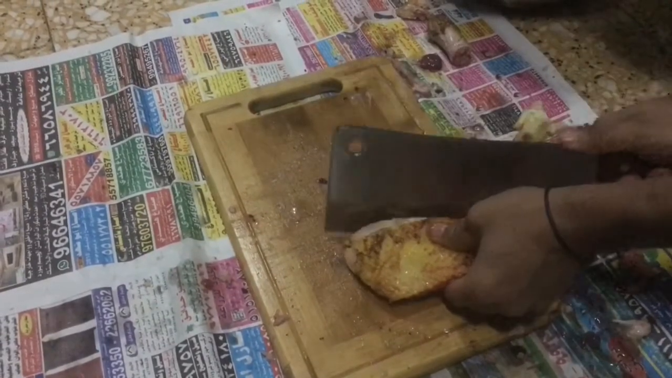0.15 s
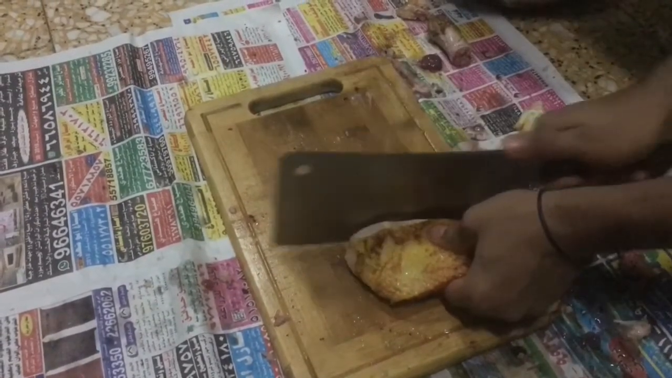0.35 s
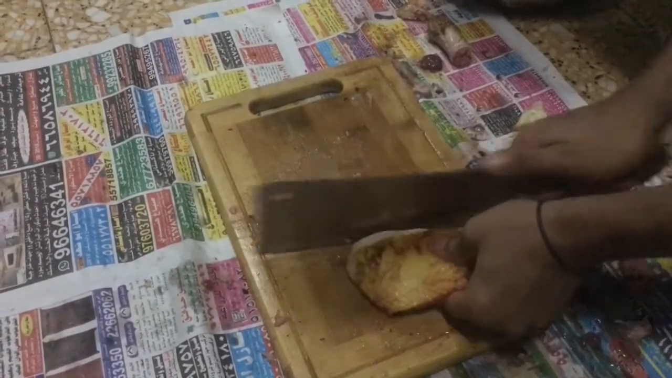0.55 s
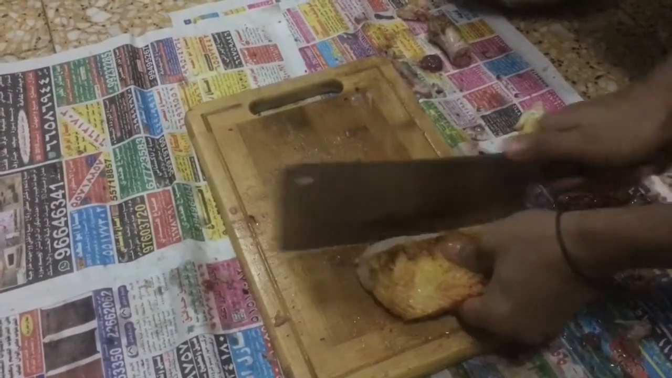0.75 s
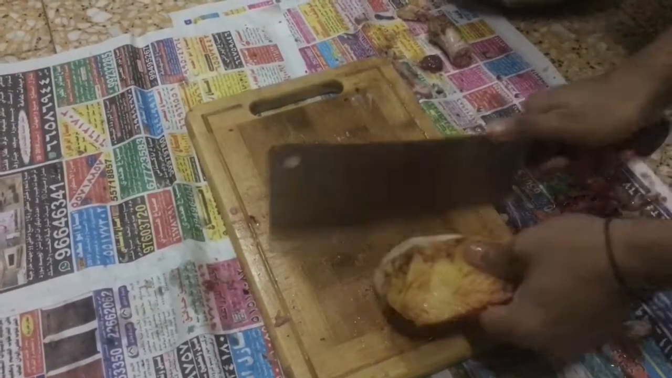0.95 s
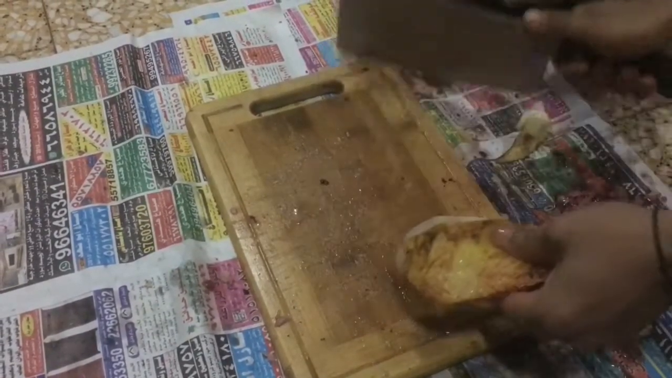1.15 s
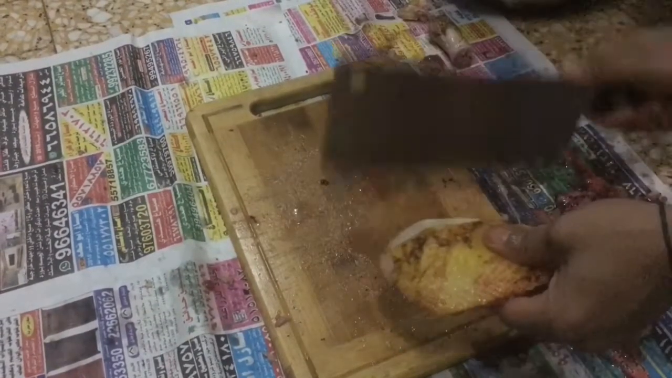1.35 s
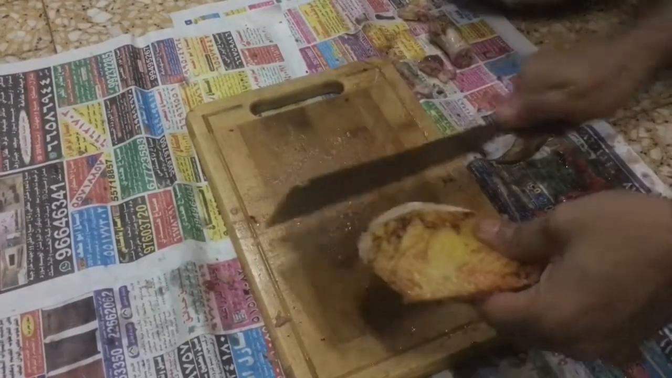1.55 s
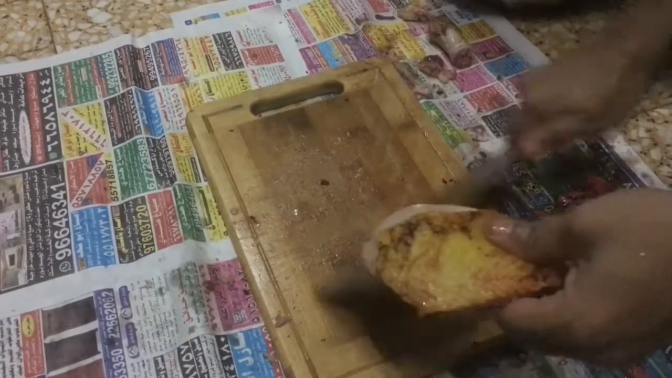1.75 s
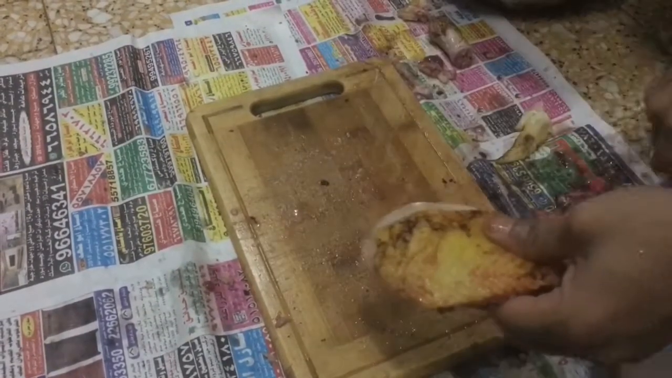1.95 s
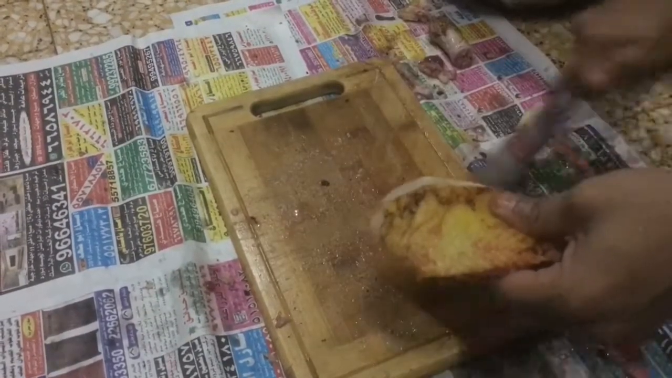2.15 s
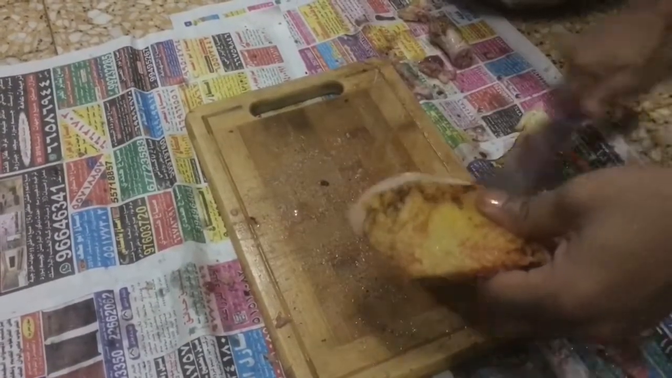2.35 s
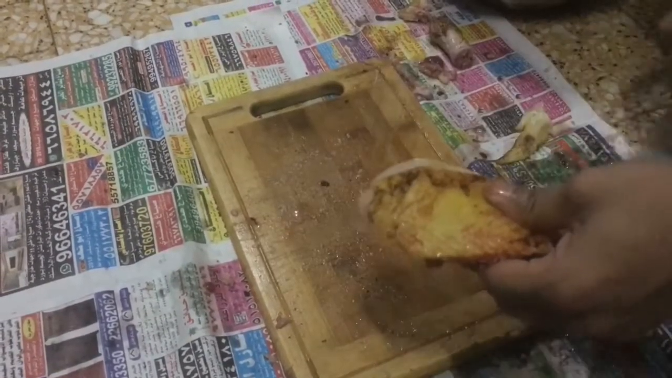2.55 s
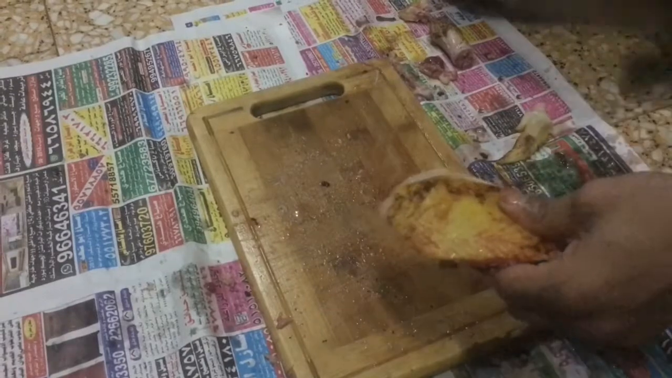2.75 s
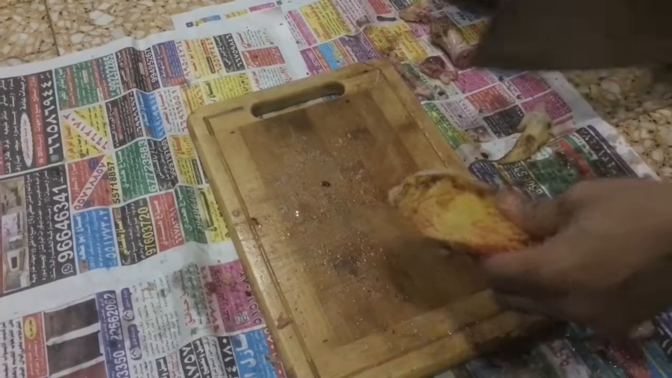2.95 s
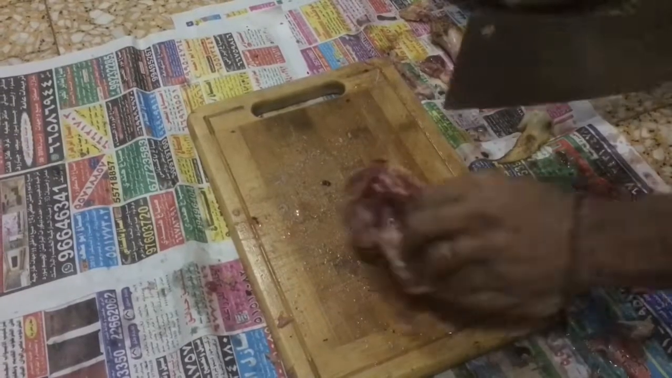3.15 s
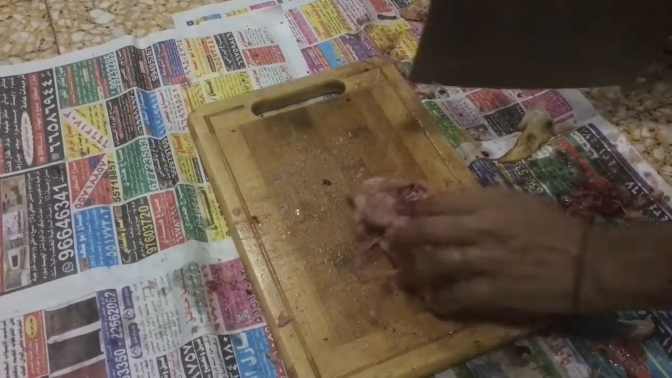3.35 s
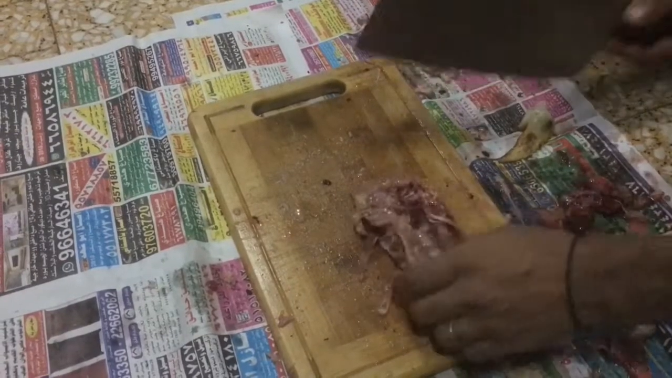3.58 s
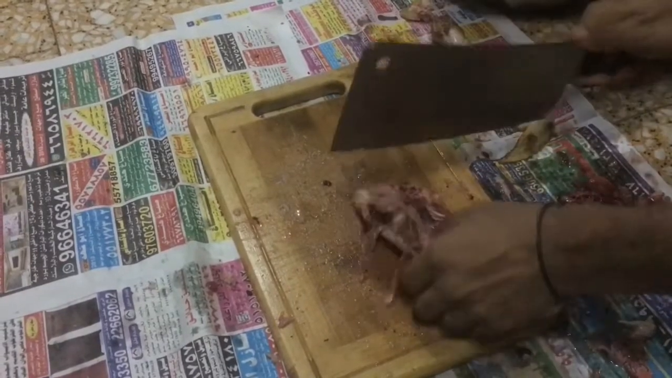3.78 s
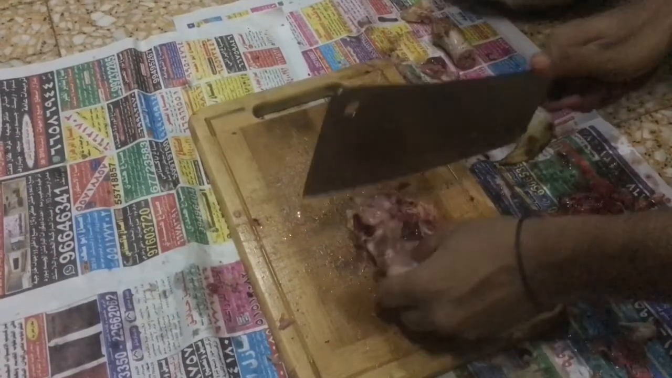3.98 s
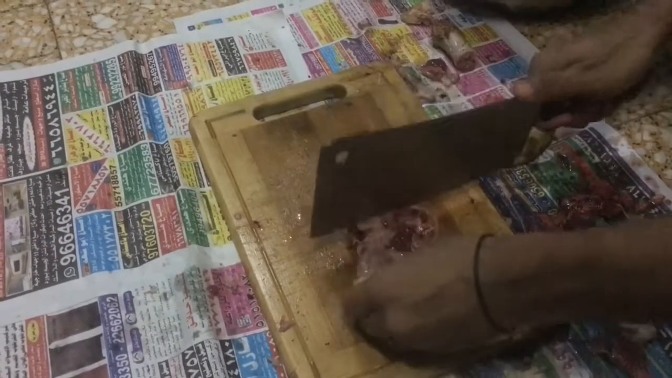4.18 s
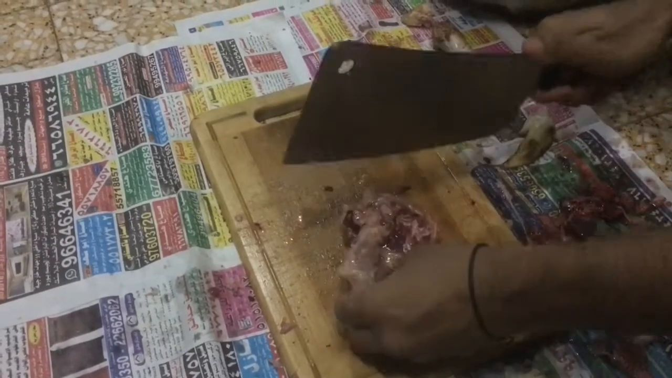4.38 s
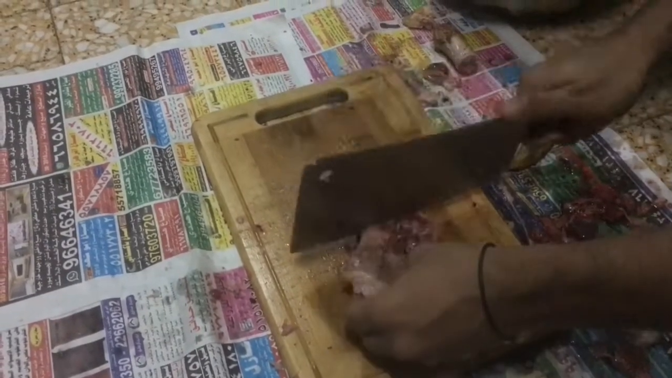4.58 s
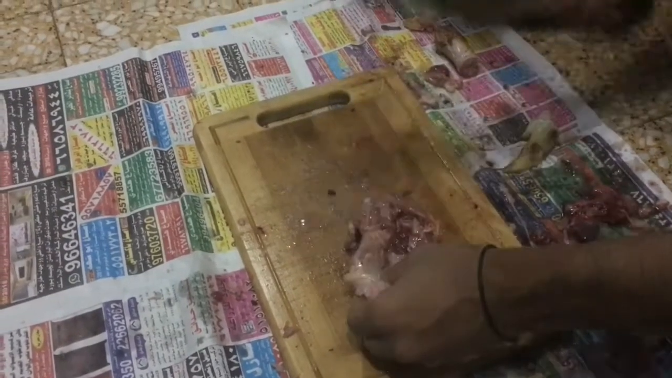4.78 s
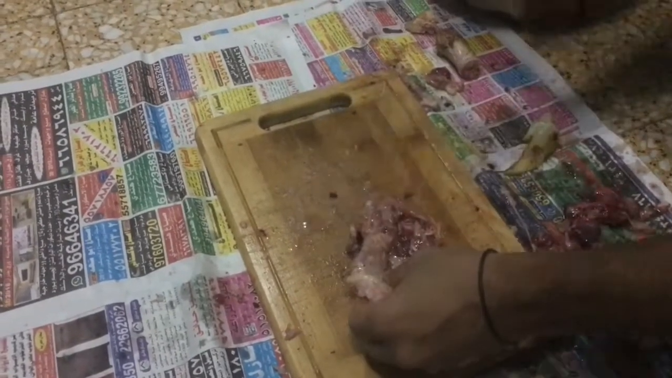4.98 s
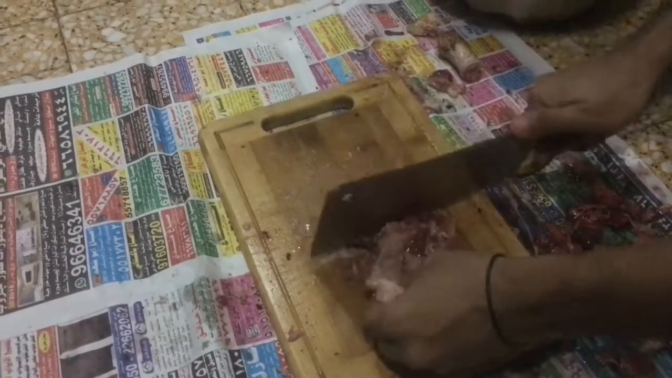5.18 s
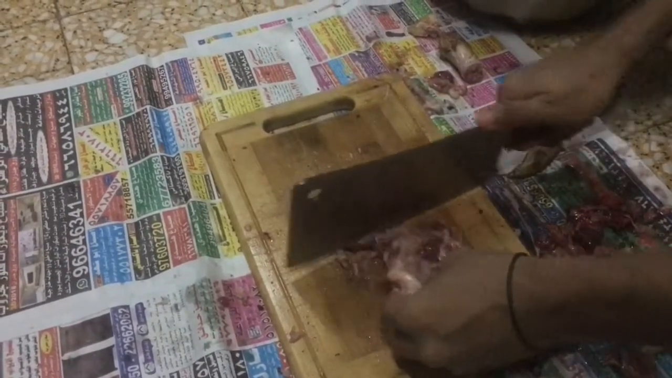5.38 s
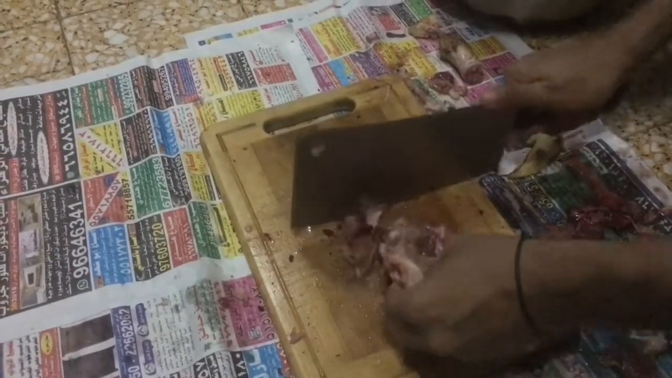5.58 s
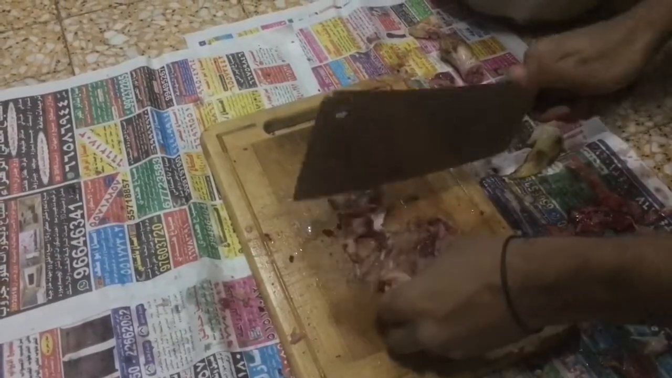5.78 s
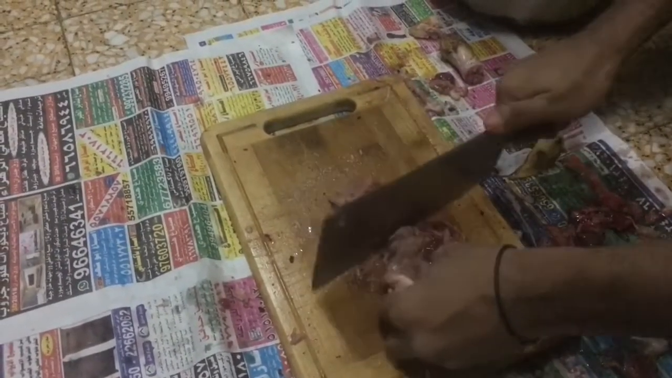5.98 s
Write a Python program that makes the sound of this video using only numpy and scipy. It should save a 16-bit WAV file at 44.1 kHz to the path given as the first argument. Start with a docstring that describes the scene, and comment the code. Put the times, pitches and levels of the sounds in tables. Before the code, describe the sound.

A low, slightly wavering fan hum with rushing air fills a small hard-floored room throughout, heard by a phone close to the work. From about 0.35 to 1.2 s a cleaver's edge scrapes over a wooden board in short strokes, rasping and hissing with a thin metallic ring; the stroke near 1.0 s is stronger and juddering. At 1.7 s a dull knock leads into the loudest, woodiest scrape, followed by a sharp knock with a bright blade ring at 2.0 s and, at 2.3 s, a duller knock with a short scrape. Then mostly hum: faint wet smacks at 3.3 s as meat is laid down, tiny sticky crackles from 4 s, a clearer wet smack at 4.6 s. At 5.13 s one very loud chop thumps the board and crunches through bone in splinters. The hum ducks, then creeps back; a light, damp knock lands at 6.0 s.

```python
"""A cleaver at work on a wooden board over newspaper on a stone floor, heard by a phone close by.
A fan hums throughout: rushing air as coloured noise, boom as resonances, motor tones as wavering sines.
First the edge scrapes scraps aside (slips shake board and blade) and knocks on the wood (ringing modes).
Then meat is laid down and handled in wet crackles, and one hard chop splits a chicken bone in a splinter shower.
The phone's gain control ducks after the chop and creeps back; a light knock comes at the very end."""
import sys
import numpy as np
from scipy import signal
from scipy.fft import rfft, irfft
from scipy.io import wavfile
from scipy.ndimage import uniform_filter1d, minimum_filter1d, map_coordinates

SR = 44100
rng = np.random.default_rng(int(sys.argv[2]) if len(sys.argv) > 2 else 0)


def wav_out(sig):
    """Save sig, one row per channel (or a flat mono array), as 16-bit PCM at SR to the path in sys.argv[1]."""
    wavfile.write(sys.argv[1], SR, np.round(np.clip(np.atleast_2d(sig).T, -1, 1) * 32767).astype(np.int16))


N = 265482  # length in samples
TOP_HZ = 16000  # the microphone hears nothing above this


def amp(db):
    """Decibels to gain."""
    return 10 ** (np.asarray(db) / 20)


def unit(x):
    """Scale to rms 1."""
    return x / np.sqrt(np.mean(x ** 2) + 1e-18)


def burst(x, db):
    """Scale a short sound so that its energy, spread over 10 ms, has this level."""
    energy = np.sum(x ** 2)
    return x * amp(db) / np.sqrt(energy / (SR / 100) + 1e-18)


def add(out, s, x):
    """Mix x into out from s seconds on, cutting what runs past the end."""
    i = max(int(s * SR), 0)
    out[i:i + len(x)] += x[:max(len(out) - i, 0)]


def fade(t60, size=16384):
    """Exponential decay that falls 60 dB in t60 seconds."""
    return np.exp(-np.log(1000) * np.arange(size) / SR / max(t60, 1 / SR))


def through(x, response):
    """Play x through an impulse response, keeping its length."""
    return signal.oaconvolve(x, response)[:len(x)]


def colour(points, size=4096):
    """Minimum-phase impulse response whose spectrum passes through (Hz, dB) points."""
    hz, db = np.transpose(points)
    bins_hz = np.arange(size // 2 + 1) * SR / size
    log_gain = np.log(amp(np.interp(np.log(bins_hz + 1), np.log(hz), db)))
    # folding the cepstrum forward in time makes the response causal
    cepstrum = irfft(log_gain)
    cepstrum[1:size // 2] *= 2
    cepstrum[size // 2 + 1:] = 0
    return irfft(np.exp(rfft(cepstrum)))


def ring(modes, wave, size=8192):
    """Sum of decaying (Hz, dB, t60) modes; a cosine start keeps the bass clean, a sine start the treble."""
    t = np.arange(size) / SR
    return sum(amp(db) * fade(t60, size) * wave(2 * np.pi * hz * t) for hz, db, t60 in modes)


def band(x, hz, width):
    """One resonance, width in Hz."""
    b, a = signal.iirpeak(min(hz, TOP_HZ), hz / min(width, TOP_HZ), fs=SR)
    return signal.lfilter(b, a, x)


def walk(rate, size):
    """Random wandering of rms 1 that takes a new direction rate times a second."""
    steps = np.arange(size) * rate / SR
    return unit(np.interp(steps, np.arange(1024), rng.standard_normal(1024)))


def grains(spread_db, size):
    """Dense tiny slips of very unequal strength, redrawn every 8 samples."""
    strengths = np.repeat(rng.standard_normal(size // 8 + 1), 8)[:size]
    return unit(rng.standard_normal(size) * amp(spread_db * strengths))


def fan(air_db=-39.5, flutter_db=1.35, waver_db=1.5, drift_hz=0.67):
    """Rushing air, the boom it raises in the room, and slightly wavering motor tones."""
    # Spectrum of the rushing air. Each row: frequency in Hz, relative level in dB.
    air_points = [(22, -37), (60, -10), (100, -0.5), (160, -1), (250, -12), (330, -11.5), (420, -21),
                  (560, -16), (780, -22), (1200, -18.5), (1800, -23), (3200, -32), (6500, -41.5),
                  (16000, -55.5)]
    # Boom of the room. Each row: frequency in Hz, filter width per pass in Hz, level in dB.
    boom_modes = [(39.4, 9.4, -45.5), (66.9, 7.2, -50.5), (106.8, 11.8, -49.5), (155.8, 23, -47.5),
                  (1650, 100, -57.5)]
    # Tones of the motor. Each row: mean frequency in Hz, mean level in dB.
    hum_tones = [(107.7, -51), (193.8, -51), (290.7, -47), (430.7, -61.5), (969, -58.5), (1938, -71),
                 (2369, -68), (2837, -78.5)]
    air = unit(through(rng.standard_normal(N), colour(air_points)))
    air = air * amp(air_db + flutter_db * walk(12, size=N))
    rush = rng.standard_normal(N)
    boom = np.zeros(N)
    for hz, width, db in boom_modes:
        boom += amp(db) * unit(band(band(rush, hz, width), hz, width))
    hum = np.zeros(N)
    for hz, db in hum_tones:
        phase = 2 * np.pi * np.cumsum(hz + drift_hz * walk(6, size=N)) / SR
        hum += np.sqrt(2) * np.sin(phase) * amp(db + waver_db * walk(4.96, size=N))
    return air + boom + hum


def sweep(share, fastest):
    """Speed of a hand stroke, 0-1: it gathers from rest, peaks, and comes to rest again."""
    rise_and_fall = np.interp(share, [0, np.clip(fastest, .05, .95), 1], [0, 1, 0])
    return np.sin(np.pi / 2 * rise_and_fall)


def scrapes(flex, wood, steel, pressed, rumble_db=-2, chatter_db=2.5, chatter_rate=260, judder_hz=78,
            bend_share=0.0138, grip_share=.015, bite_s=0.033, rasp_law=0.75, hiss_law=1.05, size=16384):
    """The edge sticks and slips over the grain, shaking board and blade; speed sets the loudness."""
    # Strokes of the edge over the board. Each row: start in seconds, length in seconds, fastest at share 0-1,
    # bites at share 0-1, drop of the wood away from the bite in dB, then levels in dB ahead of speed and bite:
    # rasp of the wood, shaking board, hiss of the steel, free blade ring, pressed blade ring;
    # last the swing of the judder in dB.
    strokes = [(0.074, 0.066, .55, .5, 2, -54, -70, -63, -49.5, -52.5, 3),
               (0.353, 0.19, 0.57, 0.61, 3, -35.5, -43, -44, -45, -45.5, 0),
               (0.569, 0.16, 0.48, 0.58, 4, -32.5, -43.5, -40, -43.5, -40, -1),
               (0.751, .14, 0.33, 0.4, 5, -35.5, -45.5, -43, -42.5, -46.5, -1),
               (0.921, 0.13, 0.9, .5, 0, -56, -58, -60, -52, -56, 1),
               (1.007, 0.081, 0.39, 0.93, 5.5, -27, -30.5, -40.5, -29.5, -49, 7),
               (1.077, 0.11, 0.28, 0.28, 5.5, -33.5, -31.5, -34.5, -31.5, -41, 2.5),
               (1.728, .13, 0.7, 0.69, 6, -39, -28.5, -56.5, -59, -54, 2),
               (1.783, 0.2, .72, 0.31, 19, -17.5, -28.5, -33, -37, -33.5, -0.5),
               (2.345, 0.22, .48, 0.26, 4.5, -40, -42, -35, -60, -35, 1.5)]
    # Spectrum of the wood's rasp. Each row: frequency in Hz, relative level in dB.
    rasp_points = [(300, -27.5), (700, -10), (1000, -12.5), (1300, -2), (1530, 5.5), (1800, -11.5),
                   (2300, -10.5), (3200, -13.5), (5000, -34)]
    # Spectrum of the steel's hiss. Each row: frequency in Hz, relative level in dB.
    hiss_points = [(1000, -14), (2000, 1.5), (3500, 4.5), (5300, -6), (7000, -3.5), (9500, -3.5),
                   (12500, -13), (16000, -19.5)]
    out, rasp, hiss = np.zeros(N), colour(rasp_points), colour(hiss_points)
    i = np.arange(size)
    t = i / SR
    for s, length, fastest, bites, bite_db, rasp_db, board_db, hiss_db, free_db, pressed_db, judder_db in strokes:
        speed = sweep(t / length, fastest)
        # the edge digs into the wood for about bite_s either side of its bite
        bite = np.exp(-((t - bites * length) / bite_s) ** 2)
        chatter = chatter_db * np.clip(walk(chatter_rate, size=size), -1.5, 1.5)
        # a steeply held edge hops along almost regularly
        hop_hz = judder_hz * (1 + 0.15 * walk(58, size=size))
        judder = judder_db * np.cos(2 * np.pi * np.cumsum(hop_hz) / SR)
        slips = unit(grains(spread_db=2.5, size=size) * amp(chatter + judder))
        # loudness of wood and steel goes with the speed of the edge to these powers
        on_wood = slips * speed ** rasp_law * amp(bite_db * (bite - 1))
        on_steel = slips * speed ** hiss_law
        paths = [(on_wood, rasp, rasp_db), (on_wood, wood, board_db), (on_wood, flex, board_db + rumble_db),
                 (on_steel, hiss, hiss_db), (on_steel, steel, free_db), (on_steel, pressed, pressed_db)]
        *steady, edge = [through(x, h / np.linalg.norm(h)) * amp(db) for x, h, db in paths]
        # grip and point of contact wander and pull the pitch of the pressed blade along
        detune = grip_share * walk(8, size=size) + bend_share * walk(50.24, size=size)
        bent_edge = map_coordinates(edge, [i + np.cumsum(detune)], order=3)
        add(out, s, sum(steady) + bent_edge)
    return out


def smacks(size=8192):
    """Wet flesh sticks and parts in small bright crackles: fading grains through one wide resonance."""
    # Wet smacks of meat and skin. Each row: start in seconds, level in dB, centre in Hz, t60 in seconds.
    wet_smacks = [(0.111, -51, 8000, .05), (1.723, -44.5, 8000, 0.011), (3.303, -47, 4270, 0.034),
                  (3.337, -51.5, 9000, 0.011), (3.4194, -49.5, 9000, 0.022), (4.587, -37.5, 5000, 0.05),
                  (4.5926, -31.5, 3950, 0.037), (4.61, -50, 6000, 0.2), (4.6838, -57, 10000, .012),
                  (4.716, -53.5, 7000, 0.06), (5.191, -29, 9000, .03), (5.254, -49, 10000, .012),
                  (5.4765, -50.5, 7900, 0.017), (5.998, -36.5, 6940, 0.087), (6.0058, -32.5, 9900, 0.016)]
    out = np.zeros(N)
    for s, db, hz, t60 in wet_smacks:
        crackles = grains(spread_db=2.0, size=size) * fade(t60, size)
        add(out, s, burst(band(crackles, hz, 1.5 * hz), db))
    return out


def knocks(flex, wood, steel, crack_t60=0.012, crack_width=0.65, thud_t60=0.045, thud_db=-3, size=8192):
    """Each blow bends the board, rings wood and blade, and cracks; a longer contact is duller."""
    # Blows of the cleaver. Each row: start in seconds, thump in dB, thump centre in Hz, wood in dB,
    # contact in ms, blade ring in dB, crack in dB, crack centre in Hz.
    blows = [(1.709, -21, 189, -17.5, 0.24, -62, -27, 2970),
             (1.9952, -34, 199, -13.5, 0.07, -15.5, -14, 2470),
             (2.196, -62, 200, -54, 0.025, -45.5, -48, 5040),
             (2.3048, -15.5, 165, -14, 0.16, -42, -14.5, 1450),
             (4.177, -59.5, 200, -56.5, .03, -46.5, -44.5, 5600),
             (5.111, -48, 199, -35, 0.024, -48, -34, 2003), (5.1215, -53, 201, -45, 0.039, -49, -41, 1710),
             (5.1297, -11, 201, -1.5, 0.039, -11, -9, 5500),
             (5.1325, -7.5, 252, 4.5, 0.064, -25.5, -15, 7450), (5.139, -4.5, 90, 0, 0.14, -35, 1.5, 1520),
             (5.147, 1, 102, -2.5, 0.048, -28.5, -5, 1600), (5.1905, -4.5, 294, -7, 0.25, -39, -9.5, 1500),
             (5.990, -55, 200, -47, .06, -38, -56, 6050),
             (6.0075, -20.5, 119, -23.5, 0.054, -45, -28, 2370)]
    # The board's crowd of small, fast fading modes. Each row: frequency in Hz, relative level in dB.
    crowd = colour([(80, -21), (250, -4), (420, -0.5), (850, -6), (1500, -3), (2400, -10.5), (4000, -10.5),
                    (9000, -17.5)])
    out, ms = np.zeros(N), np.arange(size) * 1000 / SR
    for s, thump_db, thump_hz, wood_db, contact_ms, ring_db, crack_db, crack_hz in blows:
        # the place of the blow picks the bending modes
        thump = band(flex, thump_hz, 0.88 * thump_hz)
        push = ms * np.exp(-ms / max(contact_ms, .01))
        thud = through(rng.standard_normal(size) * fade(thud_t60, size), crowd)
        knock = through(push, burst(wood, 0) + burst(thud, thud_db))
        crack = rng.standard_normal(size) * fade(crack_t60, size)
        for _ in range(2):
            crack = band(crack, crack_hz, crack_width * crack_hz)
        board = burst(thump, thump_db) + burst(knock, wood_db)
        add(out, s, board + burst(steel, ring_db) + burst(crack, crack_db))
    return out


def handling(spread_db=4, centre_hz=9000, size=1024):
    """Tiny sticky crackles under the fingers as the meat is held and turned."""
    # One row: nominal start in seconds, end in seconds, crackles per second of that span (sets their number),
    # level in dB of a crackle of strength 0.
    start, end, rate, db = (4, 6.0, 24, -67)
    out = np.zeros(N)
    # times reach a tenth of the span ahead of the nominal start
    for when, strength in rng.uniform(-1.2, 1, (int(rate * (end - start)), 2)):
        crackle = band(rng.standard_normal(size) * fade(0.01, size), centre_hz, centre_hz)
        s = start + (end - start) * (when + 1) / 2
        add(out, s, burst(crackle, db + 2 * spread_db * strength))
    return out


def bone(wood, size=8192):
    """Splinters snap in a fast fading shower, heard directly and through the board; the direct crunch lasts longer."""
    # The bone gives way. One row: start in seconds, splinters into the board in dB, their t60 in seconds,
    # bright crunch in dB, its t60 in seconds.
    s, wood_db, wood_t60, crunch_db, crunch_t60 = (5.128, -1, 0.08, -2.5, 0.1348)
    # Spectrum of the crunch. Each row: frequency in Hz, relative level in dB.
    crunch_points = [(500, -17.5), (1500, 3), (3000, -0.5), (6500, -4), (10000, -5.5), (16000, -12.5)]
    out, snaps = np.zeros(N), grains(spread_db=5.5, size=size)
    in_board = band(through(snaps * fade(wood_t60, size), wood), 1600, 2000)
    crunch = through(snaps * fade(crunch_t60, size), colour(crunch_points))
    add(out, s, burst(in_board, wood_db) + burst(crunch, crunch_db))
    return out


def room(x, near_db=-10, near_t60=0.1, far_db=-21, far_t60=0.15, dull_hz=5000, size=16384):
    """Floor and body scatter the sound early; the walls add a fainter, slower tail; both are dulled."""
    near = rng.standard_normal(size) * fade(near_t60, size) * (1 - fade(.02, size))
    far = rng.standard_normal(size) * fade(far_t60, size) * (1 - fade(0.12, size))
    echoes = amp(near_db) * near / np.linalg.norm(near) + amp(far_db) * far / np.linalg.norm(far)
    b, a = signal.butter(1, dull_hz, fs=SR)
    return x + through(x, signal.lfilter(b, a, echoes))


def bass_tail(x, tail_db=-10, t60=0.52, below_hz=150, size=32768):
    """The lowest notes linger in the room: a long noise tail, low-passed."""
    tail = rng.standard_normal(size) * fade(t60, size)
    tail = amp(tail_db) * tail / np.linalg.norm(tail)
    b, a = signal.butter(2, below_hz, fs=SR)
    return through(x, signal.lfilter(b, a, tail))


def scene(flex_hz=300):
    """Cleaver, board and meat in the room, over the fan."""
    # Modes of the board. Each row: frequency in Hz, relative level in dB, t60 in seconds.
    board_modes = [(108.2, -10.5, 0.16), (138.6, -1.5, 0.036), (192.6, 0, 0.071), (241, 2, .04),
                   (349, -2.5, 0.066), (448, -1.5, 0.024), (542, 0, 0.024), (696, 0.5, 0.041),
                   (986, -2.5, 0.047), (1121, 3.5, 0.031), (1263, 0.5, 0.036), (1350, -1, 0.02),
                   (1552, -3.5, 0.043), (1610, 4.5, 0.038), (1945, 2, 0.026), (2070, -9, 0.032),
                   (2190, -9, 0.019), (3000, -5.5, 0.014), (3030, -3.5, 0.017), (3890, -15, .02)]
    # Modes of the blade. Each row: frequency in Hz, t60 in seconds, relative level in dB when it rings freely,
    # relative level in dB when its edge is dragged under pressure.
    blade_modes = [(1228, 0.12, -3, -31.5), (2350, 0.045, -9, -6), (2670, 0.19, -10, -18),
                   (2853, 0.076, 0, -9), (2880, 0.053, 1.5, -9.5), (3642, 0.093, 2, -19),
                   (3740, 0.037, -15, -6), (4360, 0.093, -15, -2.5), (4760, 0.032, -27.5, -17),
                   (6120, 0.041, -8, 4.5), (6900, 0.072, -1, -8), (7100, 0.023, -0.5, -10),
                   (8200, 0.047, -21, 2), (8300, .035, -8, -5), (9200, .05, -21.5, -11.5),
                   (9860, .04, -30, -2), (12000, 0.027, -29, 1), (13350, .025, -28, -6)]
    flex = ring([m for m in board_modes if m[0] < flex_hz], np.cos)  # the whole board bounces on the paper
    wood = ring([m for m in board_modes if m[0] >= flex_hz], np.cos)
    steel = ring([(hz, db, t60) for hz, t60, db, _ in blade_modes], np.sin)
    pressed = ring([(hz, db, t60) for hz, t60, _, db in blade_modes], np.sin)
    work = scrapes(flex, wood, steel, pressed) + smacks() + knocks(flex, wood, steel) + handling() + bone(wood)
    return (fan() + room(work) + bass_tail(work))[None]


def gain_control(x, limit_db=-9, hold_s=0.083, release_s=0.31):
    """Turn down at once when the 10 ms level passes the limit, hold, then recover slowly."""
    power = np.abs(uniform_filter1d(x ** 2, SR // 100))
    over_db = np.maximum(10 * np.log10(power + 1e-18) - limit_db, 0)
    half = int(hold_s * SR / 2)
    # the minimum of the negative is a running maximum
    held = -minimum_filter1d(-over_db, 2 * half + 1, origin=half, mode="constant")
    recovery = np.exp(-np.arange(N) / SR / release_s)
    cut_db = np.maximum.accumulate(held / recovery) * recovery
    return x * amp(-cut_db)


def record(dry):
    """The phone cuts the deepest bass, rides its gain, rounds the highest peaks and cuts the top."""
    no_rumble = signal.sosfilt(signal.butter(6, 30, "high", fs=SR, output="sos"), dry[0])
    x = gain_control(no_rumble)
    rounded = x / (1 + x ** 4) ** (1 / 4)
    return signal.sosfilt(signal.ellip(10, .2, 70, TOP_HZ, fs=SR, output="sos"), rounded)[None]


dry = scene()
out = record(dry)
wav_out(out)
```